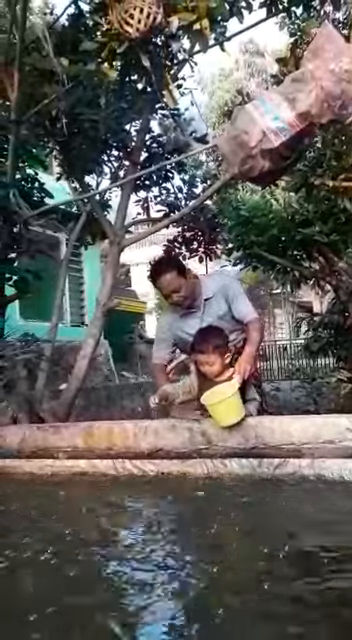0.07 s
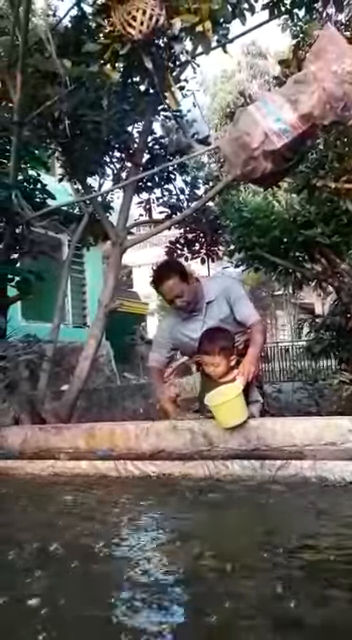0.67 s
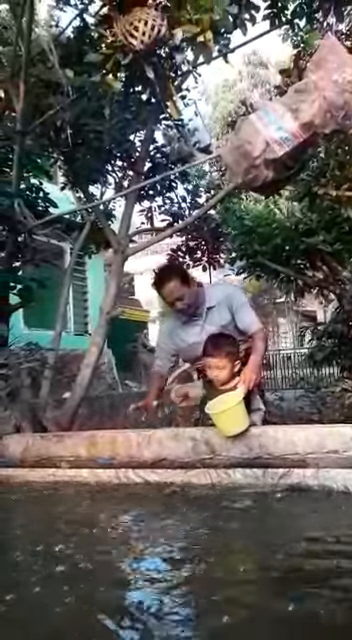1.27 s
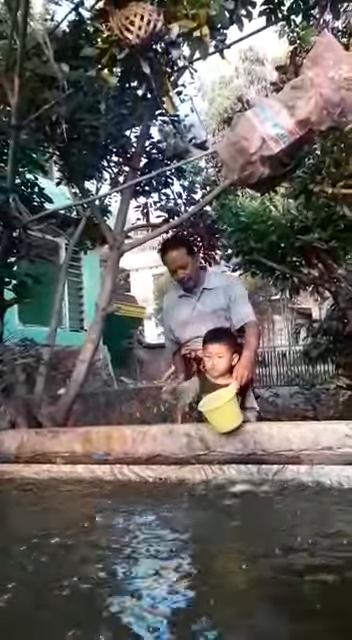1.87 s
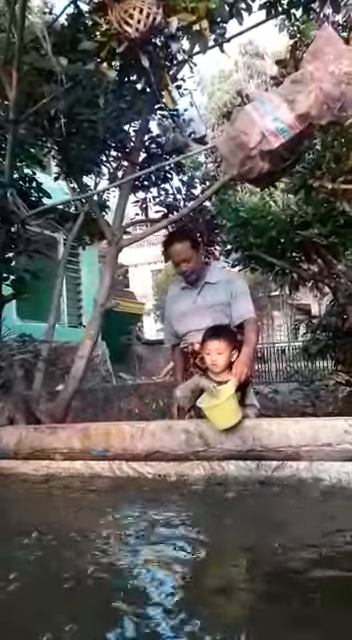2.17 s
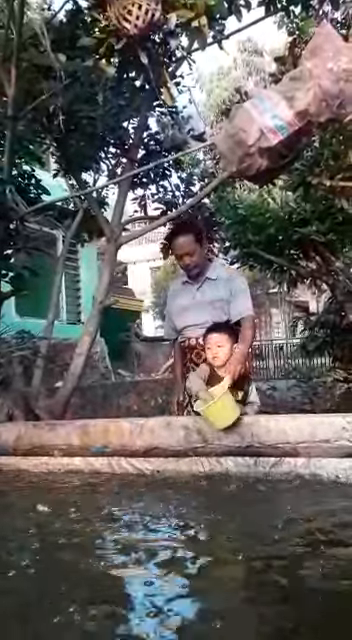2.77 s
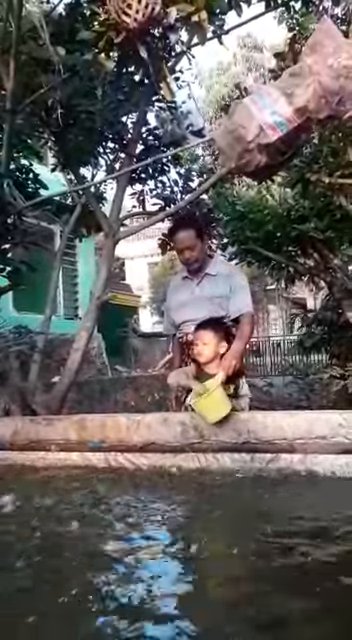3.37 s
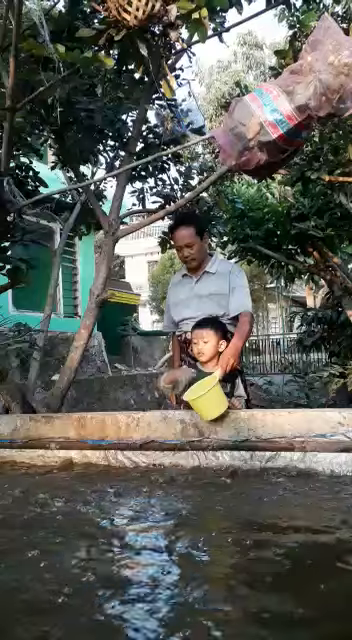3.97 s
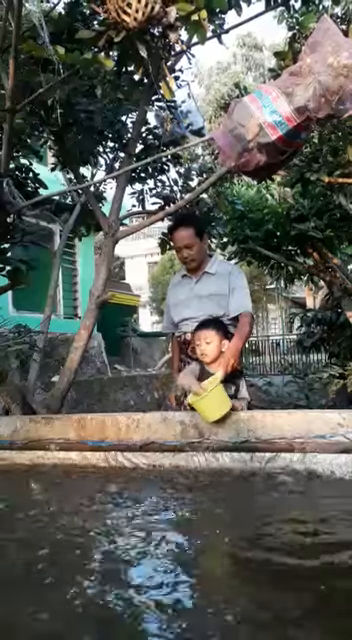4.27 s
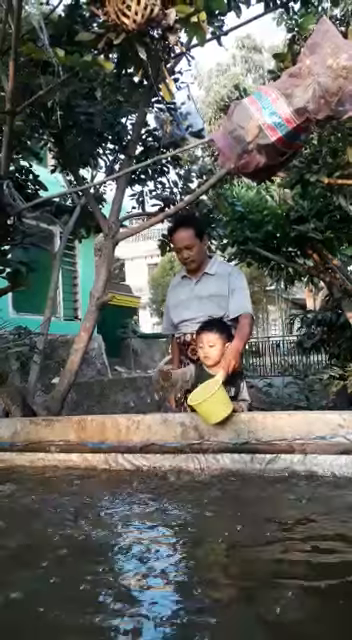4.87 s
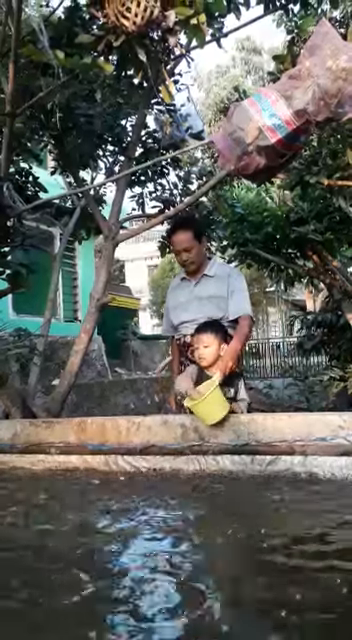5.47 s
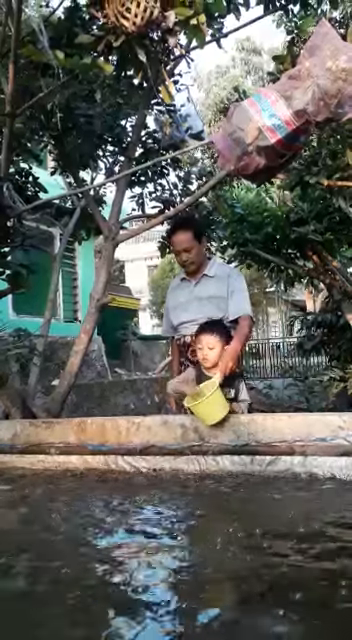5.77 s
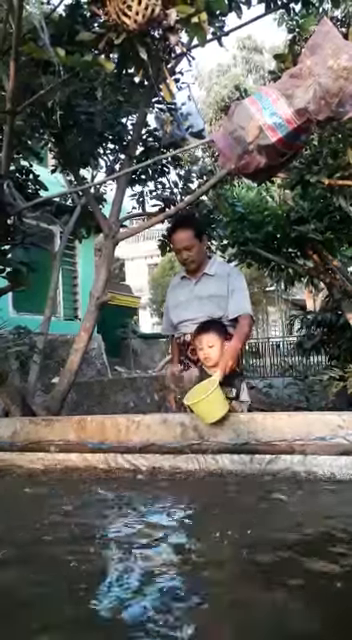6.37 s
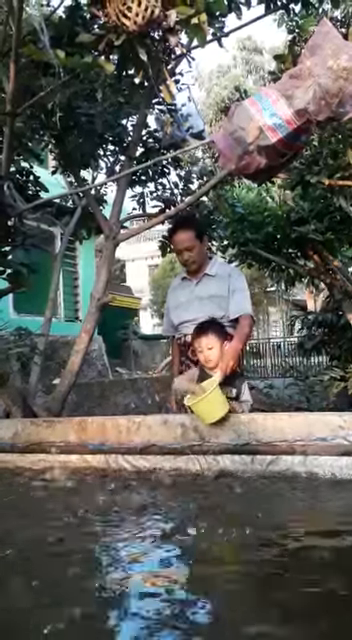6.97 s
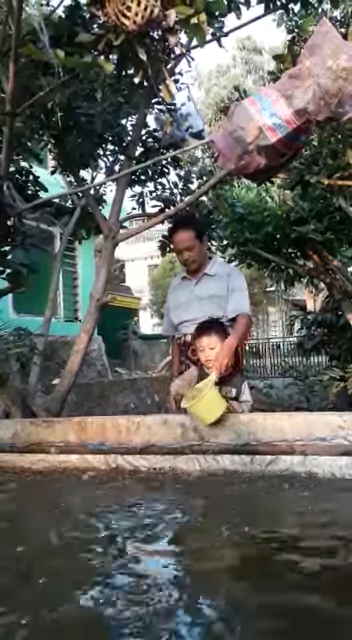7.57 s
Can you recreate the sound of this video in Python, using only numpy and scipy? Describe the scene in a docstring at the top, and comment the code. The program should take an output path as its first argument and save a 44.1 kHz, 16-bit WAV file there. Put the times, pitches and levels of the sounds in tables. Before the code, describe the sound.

Fish feed at the surface of an outdoor pond, heard from near the water. For the first 1.5 seconds there is a soft gurgle and fizz, with tiny high ticks of pellets and droplets and a few small plops. From about 1.5 to 2.1 seconds comes a cluster of short tail splashes and sharp, bubbly mouth snaps, the strongest near 1.7 seconds. The water then stays busier, with hollow gulps that slide up in pitch, plinking drips and trickling spray. A sharp drip lands near 2.9 seconds. More snaps and quick splashes stand out around 3.5, from 4.3 to 5.4, and around 6.4 seconds. The churning is densest from about 7 seconds to the end, near 7.7 seconds. The pond walls add a very short echo, and a faint, steady low rumble of the surroundings lies underneath throughout.

```python
"""A walled garden pond, where fish feed at the surface while pellets patter onto the water.
Mouths snap and gulp, tails throw short splashes and droplets tick all around; the stirring grows denser.
Nearly every sound is a trapped air bubble ringing like a tiny bell: the smaller it is, the higher it
rings. The pond walls answer with a short echo, over a faint outdoor rumble."""
import sys
import numpy as np
from scipy import signal
from scipy.fft import rfft, irfft, next_fast_len
from scipy.io import wavfile
from scipy.ndimage import map_coordinates

SR = 44100
rng = np.random.default_rng(int(sys.argv[2]) if len(sys.argv) > 2 else 0)


def pcm_store(signal):
    """Save signal as 16-bit PCM."""
    levels = np.round(np.clip(np.atleast_2d(signal), -1, 1) * 32767)
    wavfile.write(sys.argv[1], SR, levels.astype(np.int16).T)


N = 340893

# the nearest mouth snaps, droplet ticks and deep plops: (time [s], pitch [Hz], level [dB])
SNAPS = [(.012, 10800, -30), (.094, 10100, -36), (0.153, 11800, -24.5), (0.2107, 11900, -23),
         (0.2413, 11500, -28), (.302, 4400, -39), (.3363, 10400, -32), (.337, 6900, -30),
         (0.362, 9800, -24), (.3762, 4500, -44), (0.391, 2430, -35), (0.4243, 1530, -27),
         (.5467, 9750, -21.5), (0.5754, 11800, -21), (0.6015, 1950, -28.5), (.6037, 4480, -34),
         (.614, 1400, -39), (.627, 9980, -23.5), (0.678, 10800, -24), (.680, 2070, -30), (.707, 9600, -29),
         (.7358, 12200, -22), (.7408, 5300, -26), (0.7452, 1820, -17.5), (.8518, 11700, -31),
         (0.856, 1830, -34), (.9312, 9100, -28), (0.947, 11300, -19.5), (1.0015, 9300, -34),
         (1.106, 8700, -26), (1.130, 13400, -22), (1.2505, 6560, -29), (1.265, 4630, -33),
         (1.2862, 10800, -29), (1.319, 7600, -25), (1.3638, 10900, -19), (1.3886, 10100, -18),
         (1.428, 3970, -28), (1.447, 9500, -20), (1.525, 5000, -27), (1.633, 3730, -9), (1.726, 3130, -2),
         (1.7278, 10500, -14), (1.89, 2930, -26), (1.9872, 9130, -16), (2.0276, 2370, -10),
         (2.0414, 9000, -13.5), (2.253, 2000, -25), (2.331, 1820, -30), (2.395, 2400, -35),
         (2.418, 12000, -26), (2.438, 3230, -31), (2.484, 11200, -22), (2.521, 4570, -28),
         (2.5993, 1740, -18.5), (2.7637, 10500, -17.5), (2.765, 2360, -20), (2.807, 4180, -32),
         (2.8455, 7100, -23), (2.874, 6040, -19), (3.051, 7200, -19), (3.1113, 2940, -24),
         (3.1506, 4400, -16.5), (3.202, 11800, -25), (3.2467, 1110, -14), (3.305, 3980, -26),
         (3.3083, 9040, -22), (3.5097, 10100, -8), (3.5148, 3680, -19.5), (3.578, 3040, -29),
         (3.5897, 10400, -14), (3.597, 3030, -21), (3.8157, 11000, -28), (3.864, 10800, -19),
         (4.0103, 8970, -30), (4.132, 3730, -29), (4.23, 14200, -19), (4.2780, 4350, -19.5),
         (4.2784, 9150, -22), (4.3640, 2120, -14), (4.3648, 5440, -13), (4.37, 12000, -10),
         (4.4976, 8680, -18), (4.5094, 10900, -18), (4.583, 10200, -18), (4.5915, 8960, -28),
         (4.7410, 11000, -9.5), (4.7412, 3400, -12.5), (4.8646, 3900, -13.5), (4.8958, 1740, -10),
         (4.896, 540, -24), (4.9009, 3820, -9.5), (4.96, 12900, -23), (5.022, 2460, -22),
         (5.0860, 3750, -23), (5.099, 10800, -20), (5.314, 9000, -20), (5.3285, 10600, -8),
         (5.522, 12400, -18), (5.708, 2520, -16.5), (5.797, 8830, -27), (5.9030, 2280, -19),
         (5.905, 3750, -25), (6.0276, 8720, -29), (6.0397, 9800, -19), (6.041, 2900, -21.5),
         (6.1147, 1790, -30), (6.126, 3500, -21.5), (6.131, 9150, -21), (6.1322, 1720, -29),
         (6.274, 4020, -30), (6.3880, 10300, -4), (6.3891, 840, -22), (6.5126, 12200, -8),
         (6.528, 5300, -14), (6.527, 600, -26), (6.754, 9110, -20.5), (7.033, 10550, -26),
         (7.111, 1030, -20), (7.205, 1100, -23), (7.229, 8660, -22), (7.2858, 1180, -17),
         (7.2905, 900, -17), (7.2903, 6100, -12.5), (7.5340, 5270, -19), (7.5850, 4000, -18.5),
         (7.677, 9200, -25)]
# tail flicks and slaps: (time [s], length [s], bubble pitch [Hz], bubble level [dB], spray level [dB])
TAIL_FLICKS = [(.004, 0.047, 3800, -49, -64), (0.115, 0.016, 2780, -45.5, -58),
               (0.289, .07, 4200, -55, -64), (0.384, 0.013, 2300, -44.5, -59),
               (0.739, 0.0086, 3660, -43, -50), (1.501, 0.033, 2930, -42, -38),
               (1.62, 0.025, 3940, -40, -37), (1.725, 0.02, 2980, -40, -31.5),
               (1.886, 0.021, 3500, -50, -36.5), (1.919, 0.031, 1710, -36.5, -33.5),
               (1.967, 0.019, 1890, -33, -35.5), (2.045, 0.028, 2610, -51, -36),
               (2.271, 0.046, 1130, -42.5, -44), (2.842, 0.023, 1520, -40, -36.5),
               (3.112, 0.01, 1630, -33.5, -38), (3.222, .012, 1920, -35, -41),
               (3.244, 0.011, 1480, -29, -48), (3.342, 0.014, 2100, -33.5, -36),
               (3.472, 0.01, 1890, -32, -52), (3.507, 0.012, 4470, -37, -32),
               (3.593, .012, 1970, -28.5, -30), (3.861, 0.044, 1400, -51, -59),
               (3.968, .03, 1610, -39.5, -45), (4.009, 0.0048, 2180, -32, -54),
               (4.237, 0.0074, 2650, -30.5, -37.5), (4.3598, 0.0079, 3530, -32, -29),
               (4.469, 0.0094, 2000, -27, -32.5), (4.765, 0.019, 1460, -31.5, -37.5),
               (4.896, 0.0095, 1800, -26.5, -35), (5.316, .005, 2380, -39, -47),
               (5.362, 0.014, 2930, -36, -33), (5.377, 0.054, 1150, -36.5, -42),
               (5.708, 0.0062, 2610, -47, -37), (5.845, 0.014, 2270, -35.5, -44),
               (6.047, 0.012, 3920, -55, -38.5), (6.13, 0.0073, 3000, -42, -40),
               (6.233, 0.013, 2180, -36, -44), (6.344, 0.0063, 2600, -35.5, -38),
               (6.388, 0.013, 1310, -34.5, -31.5), (6.467, 0.025, 2010, -34.5, -36),
               (6.524, 0.014, 4700, -30, -27), (6.568, 0.018, 4030, -34, -29.5),
               (6.581, 0.026, 1590, -35.5, -45), (7.084, 0.04, 1064, -35, -37.5),
               (7.188, 0.029, 1850, -35.5, -38.5), (7.287, 0.018, 1085, -29, -32),
               (7.36, 0.044, 1400, -39, -39), (7.583, 0.022, 1340, -39, -35.5)]
# big gulped bubbles: (time [s], starting pitch [Hz], length [s], pitch climb [octaves], level [dB])
GULP_BUBBLES = [(0.553, 750, .045, 0.17, -39.5), (0.975, 1800, .012, 0.41, -39),
                (1.014, 764, 0.023, 0.78, -45), (1.023, 1800, 0.012, 0.29, -38),
                (1.043, 1032, 0.027, 0.9, -42), (1.141, 836, 0.03, 0.43, -34),
                (1.348, 800, 0.0078, .3, -36), (1.395, 1530, 0.015, 0.24, -42),
                (1.423, 986, 0.029, .35, -44), (1.453, 870, 0.022, -0.04, -35.5),
                (1.488, 1590, 0.01, 0.23, -34), (1.489, 920, .016, .3, -40),
                (1.774, 907, 0.016, 0.4, -27.5), (1.813, 1920, 0.0078, 0.24, -25),
                (1.868, 536, 0.014, 0.26, -32), (1.944, 750, 0.011, 0.29, -27.5),
                (2.064, 1060, 0.014, 0.32, -27), (2.144, 804, 0.012, 0.34, -33),
                (2.278, 790, 0.02, 0.36, -31.5), (2.306, 760, 0.0175, 0.46, -30.5),
                (2.427, 1150, 0.0066, 0.32, -27), (2.54, 634, 0.0092, 0.14, -29.5),
                (2.647, 1200, 0.012, .2, -34), (2.74, 523, 0.0068, 0.34, -29),
                (2.789, 472, 0.011, 0.43, -32), (2.844, 560, 0.011, 0.64, -30),
                (2.993, 715, 0.046, 0.28, -36), (3.285, 1070, .011, 0.14, -37),
                (3.325, 807, 0.024, 0.91, -34), (3.398, 703, 0.018, .3, -37),
                (3.54, 477, 0.014, 0.17, -31.5), (3.624, 580, 0.025, .5, -35.5),
                (3.637, 1800, 0.011, 0.26, -27), (3.653, 933, .01, 0.19, -29.5),
                (3.746, 585, 0.027, -0.046, -34), (3.861, 1017, 0.021, 0.72, -22),
                (3.962, 1106, 0.029, 0.23, -37), (4.027, 683, 0.031, 0.17, -35),
                (4.105, 1370, 0.014, 0.27, -33), (4.123, 1210, 0.014, 0.17, -31),
                (4.266, 219, 0.04, 0.41, -42), (4.437, 860, 0.0096, 0.39, -30),
                (4.647, 1060, 0.016, 0.12, -30), (5.044, 820, 0.026, -0.083, -32),
                (5.072, 500, 0.011, -0.11, -36.5), (5.088, 688, 0.015, 0.16, -33),
                (5.158, 844, 0.036, 0.47, -37.5), (5.299, 600, 0.035, 0.031, -35),
                (5.318, 1160, 0.014, 0.29, -28), (5.381, 995, 0.026, 0.22, -28),
                (5.395, 212, 0.029, 0.41, -37), (5.421, 954, 0.02, 0.6, -38), (5.644, 461, 0.02, 1, -20),
                (5.79, 1210, 0.012, 0.05, -27.5), (5.847, 1298, 0.027, 0.17, -26),
                (5.958, 1040, 0.0064, 0.049, -33), (6.061, 1070, 0.007, 0.17, -33),
                (6.285, 730, 0.025, 0.38, -33.5), (6.317, 940, 0.02, 0.78, -32.5),
                (6.54, 840, 0.01, 0.12, -25.5), (6.596, 442, 0.018, 0.4, -29.5),
                (6.618, 520, .013, 0.093, -33), (6.648, 1120, .018, -0.079, -37.5),
                (6.716, 468, 0.041, 0.29, -29), (6.769, 722, 0.02, 0.61, -29.5),
                (6.784, 1167, 0.016, 0.34, -21.5), (6.848, 1240, 0.032, 0.14, -31),
                (6.863, 688, .05, 0.51, -40), (7.011, 1616, 0.014, 0.45, -28),
                (7.082, 640, .011, 0.31, -27), (7.112, 730, 0.011, 0.62, -27),
                (7.119, 272, 0.023, 0.57, -33.5), (7.287, 577, 0.014, 0.03, -27),
                (7.605, 725, 0.018, 0.5, -26)]
# drops falling back into the pond: (time [s], pitch [Hz], ring time [s], level [dB])
FALLING_DROPS = [(0.747, 1770, 0.011, -33), (.768, 3400, 0.0043, -34), (1.08, 2060, 0.0017, -22.5),
                 (1.308, 7750, 0.00065, -20), (1.509, 1850, 0.0035, -28), (1.573, 8300, .0012, -29),
                 (1.633, 5180, .0015, -20), (1.727, 2930, 0.017, -26), (1.83, 2880, .002, -31),
                 (1.889, 2020, .002, -26), (1.975, 3000, .002, -19), (2.054, 3000, 0.0024, -24),
                 (2.124, 2120, 0.0028, -32), (2.16, 5660, 0.0019, -31), (2.168, 2060, 0.0029, -30),
                 (2.512, 2480, 0.0019, -24), (2.549, 1560, 0.0025, -24), (2.837, 2460, 0.0022, -24),
                 (2.854, 2680, 0.0024, -24), (2.8753, 1920, 0.0013, -4.5), (2.877, 1954, 0.012, -37),
                 (2.884, 1520, 0.0033, -25), (3.092, 2890, .002, -31), (3.193, 2960, 0.0022, -26),
                 (3.369, 3200, .002, -23), (3.389, 2200, 0.0019, -23), (3.414, 1910, 0.0025, -25),
                 (3.446, 1920, .003, -25), (3.539, 6700, .0013, -24), (3.708, 4100, .0013, -26),
                 (3.73, 1940, 0.0034, -28), (3.787, 2850, 0.0023, -26), (3.829, 1900, 0.0019, -23.5),
                 (3.915, 5260, .0013, -23), (4.181, 1700, 0.0036, -29), (4.486, 2170, 0.0066, -33),
                 (4.529, 2480, 0.0019, -20), (4.668, 2650, .002, -29), (5.03, 4270, 0.0022, -27.5),
                 (5.045, 2970, .002, -29), (5.043, 1780, .002, -23), (5.113, 4320, 0.0025, -32),
                 (5.114, 6050, .003, -29), (5.124, 2900, .005, -40), (5.143, 3080, 0.0054, -35),
                 (5.362, 3140, 0.0028, -19.5), (5.623, 4600, 0.0017, -30.5), (5.903, 2170, 0.018, -36),
                 (5.905, 3880, .009, -30), (6.041, 2930, 0.0033, -22), (6.045, 5220, .002, -24),
                 (6.272, 2090, 0.0016, -25), (6.428, 1900, 0.0041, -27.5), (6.6, 2030, 0.0043, -21),
                 (6.617, 1630, 0.0018, -23), (6.671, 3770, .002, -31), (6.692, 3540, .003, -27),
                 (6.706, 4330, 0.0019, -32), (6.893, 4120, 0.0023, -27.5), (6.942, 2010, 0.0036, -26),
                 (6.999, 4250, 0.0021, -26), (7.031, 2150, .003, -31), (7.208, 3100, .002, -25),
                 (7.36, 3160, .002, -33), (7.36, 1660, 0.0027, -22), (7.452, 3200, 0.0018, -31),
                 (7.475, 1830, .002, -28), (7.51, 1700, 0.0028, -26), (7.535, 5470, 0.0068, -30),
                 (7.597, 2240, .002, -30)]
# how hard the fish stir the water: (time [s], level [dB])
STIR_LEVEL = [(0, -51), (.2, -57), (.5, -60), (.65, -55), (.95, -54), (1.25, -56.5), (1.5, -49.5),
              (1.65, -49), (1.8, -49), (2.1, -46.5), (2.25, -52), (2.5, -50.5), (2.65, -45.5),
              (2.85, -46.5), (3.5, -46.5), (3.75, -47.5), (4.0, -46), (4.22, -46.5), (4.45, -44),
              (4.9, -44), (5.2, -46.5), (5.4, -41), (5.65, -47.5), (5.85, -43), (6.03, -51), (6.2, -47),
              (6.5, -46), (6.85, -44.5), (7.15, -42.5), (7.4, -41), (7.73, -44)]
# how much water is thrown about and trickles back: (time [s], level [dB])
SPRAY_LEVEL = [(0, -54), (.2, -58), (.38, -53.5), (.53, -58), (.8, -54.5), (1.15, -54.5), (1.3, -54),
               (1.58, -51.5), (1.75, -48.5), (1.85, -48), (1.97, -42.5), (2.2, -50), (2.3, -42.5),
               (2.35, -52.5), (2.45, -45), (2.5, -52.5), (2.57, -45), (2.64, -51.5), (2.7, -53),
               (2.85, -45), (3.03, -46.5), (3.3, -45.5), (3.6, -44), (3.78, -44.5), (3.95, -43.5),
               (4.2, -50.5), (4.47, -43), (4.68, -46), (4.85, -46.5), (5.0, -43.5), (5.22, -47),
               (5.38, -45), (5.55, -47), (5.69, -44), (5.8, -51), (5.95, -49), (6.0, -53.5), (6.12, -51),
               (6.33, -50), (6.5, -50.5), (6.58, -47), (6.72, -42), (6.85, -47), (7.0, -42), (7.2, -40.5),
               (7.26, -46.5), (7.38, -43.5), (7.73, -44)]
# the dull tone of sloshing water: (frequency [Hz], level [dB])
SLOSH_TONE = [(60, -23.5), (150, -7), (260, -7.5), (400, -5.5), (600, -2), (1000, -1.5), (1500, -5.5),
              (2200, -15.5), (4000, -36), (12000, -45)]
# the bright, hissy tone of spray: (frequency [Hz], level [dB])
WASH_TONE = [(600, -38), (1500, -5.5), (2200, -3.5), (4000, -1), (6500, -1.5), (9000, -1.5), (16000, -9)]
# how long the wall echo takes to fade by 60 dB: (frequency [Hz], fade time [s])
ECHO_FADE = [(200, 0.19), (1500, 0.28), (5000, 0.15), (14000, 0.26)]
# the deep tone of the distant surroundings: (frequency [Hz], level [dB])
RUMBLE_TONE = [(25, -29), (50, 1), (85, 3.5), (120, 1.5), (160, 3.5), (250, -2.5), (450, -3.5), (700, -11),
               (1200, -22), (4000, -26.5), (16000, -27)]
# how the microphone lifts or lowers each frequency: (frequency [Hz], gain [dB])
MICROPHONE_TONE = [(25, -17), (45, -12.5), (70, -4), (3000, -1.5), (4300, 1.5), (5400, -1), (6500, 0.5),
                   (7800, -5), (9000, 3.5), (9800, 0), (11000, 0.5), (13000, -3), (15800, -1)]

TOP_HZ = 15950  # the microphone hears nothing above this


def snaps():
    """A mouth or a droplet cracks the surface and traps one bubble, which rings for a few cycles."""
    times, hz, db = np.transpose(SNAPS)
    octaves = np.log2(hz / 4000)  # how far above 4 kHz
    # small bubbles ring for more cycles; hard snaps break theirs sooner
    cycles = 2.23 * (hz / 4000) ** 0.09 * 2 ** (-(db + 20) / 22.5)
    gain = amp(db + 3 + 0.9 * octaves)
    track = full_length(bubbles(times, hz, gain, cycles, rise=0.004, swell_cycles=0.38))
    t = np.arange(SR // 200) / SR
    for start, crack_db in zip(times, db - 14 - 0.5 * octaves):  # tiny droplets crack less
        crack = rng.standard_normal(len(t)) * fade(t, seconds=0.0035)
        add(track, start, amp(crack_db) * crack)
    return track


def splashes():
    """A tail tears the surface into bubbles and spray; a hiss, falling droplets and a few plips follow."""
    def births(length, count):
        return length * np.linspace(0, 1, count) ** 1.1 * rng.uniform(.4, 1.35, count)

    track, hiss_gain = np.zeros((2, N))
    t = np.arange(SR // 3) / SR
    for start, length, hz, bubble_db, spray_db in TAIL_FLICKS:
        cloud = swarm(births(length, 36), hz=hz, octaves=.55, cycles=1.8, spread_db=5.5, rise=.03)
        spray = swarm(births(length, 60), hz=9200, octaves=.45, cycles=.7, spread_db=5, rise=.01)
        plips = swarm(2 * births(length, 7), hz=0.9 * hz, octaves=.4, cycles=9, spread_db=3,
                      rise=.15, swell_cycles=3)
        landings = length + rng.exponential(.022, size=16)  # droplets fly for 22 ms on average
        droplets = swarm(landings, hz=5600, octaves=.6, cycles=3, spread_db=4, rise=.03)
        for layer, db in [(cloud, bubble_db - .7), (spray, spray_db - .6),
                          (plips, bubble_db - 11.5), (droplets, spray_db - 12)]:
            add(track, start, amp(db) * layer * np.sqrt(length * SR / np.sum(layer ** 2)))
        # the thrown sheet of water hisses as it falls back
        swell = 1 - np.exp(-t / 0.0065)
        add(hiss_gain, start, amp(spray_db - 8.5) * swell * fade(t, seconds=0.11))
    return track + hiss_gain * unit(noise(WASH_TONE))


def gulps():
    """A big air pocket swells, quivers and dies away; its pitch slides, mostly up, as it changes shape."""
    track = np.zeros(N)
    quiver, flutter = wobble(rate_hz=260), wobble(rate_hz=300)
    for start, start_hz, length, climb, db in GULP_BUBBLES:
        progress = np.arange(int(2 * length * SR)) / (length * SR)
        now = np.minimum(int(start * SR) + np.arange(len(progress)), N - 1)
        hz = start_hz * 2 ** (climb * np.minimum(progress, 1.3)) * (1 + .04 * quiver[now])
        shape = (1 - np.exp(-progress / 0.11)) * np.exp(-1.8 * progress ** 2)
        gain = amp(db - 1.3 + 2.3 * flutter[now]) * shape / shape.max()
        add(track, start, gain * np.sin(2 * np.pi * np.cumsum(hz) / SR))
    return track


def drips():
    """A falling drop traps a bubble that rings on, its pitch creeping upward."""
    times, hz, ring_s, db = np.transpose(FALLING_DROPS)
    return full_length(bubbles(times, hz, amp(db), cycles=ring_s * hz, rise=.028, swell_cycles=1))


def stirring():
    """The fish churn the whole pond: far bubbles blur into a wash, and nearer ones stand out of it."""
    lapping_db = 0.9 * wobble(rate_hz=40)
    gurgle_db = level(STIR_LEVEL) + lapping_db + 0.5 * wobble(rate_hz=8)
    spray_db = level(SPRAY_LEVEL) + lapping_db
    fizz_db = -46.5 + 0.62 * (spray_db - spray_db.mean()) + wobble(rate_hz=47)  # more spray, more fizz
    slosh, wash = noise(SLOSH_TONE), noise(WASH_TONE)
    gurgle = swarm(random_times(2400), hz=1150, octaves=.55, cycles=3.4, spread_db=5, rise=.06)
    patter = swarm(random_times(4400), hz=3200, octaves=.62, cycles=2.6, spread_db=3.3, rise=.045)
    fizz = swarm(random_times(9000), hz=10460, octaves=.39, cycles=2.9, spread_db=5, rise=.0053)
    # pellets and droplets tick one by one
    ticks = swarm(random_times(150), hz=11600, octaves=.18, cycles=2.4, spread_db=4, rise=.01)
    # bubbles that reach the surface chirp upward
    plips = swarm(random_times(420), hz=1400, octaves=.65, cycles=6.5, spread_db=2.5,
                  rise=.12, swell_cycles=4)
    layers = [(slosh, gurgle_db - 3.5), (gurgle, gurgle_db - 1.5), (plips, gurgle_db - 11),
              (wash, spray_db - 2), (patter, spray_db - 0.5),
              (fizz, fizz_db - 1), (ticks, fizz_db - 9)]
    return sum(amp(db) * unit(full_length(layer)) for layer, db in layers)


def walls(sound, near_db, near_fade_s, far_db, spots):
    """The pond's rim and garden walls echo; each slice of time gets its own echo, as if from a new spot."""
    track = np.zeros(N)
    for part in np.array_split(np.arange(N), spots):
        hz, t, spectrum = signal.stft(rng.standard_normal(SR // 3), SR, nperseg=256)
        spectrum = spectrum * fade(t, seconds=along(ECHO_FADE, hz)[:, None])
        far = signal.istft(spectrum, SR, nperseg=256)[1]
        bounces = rng.standard_normal(len(far)) ** 3  # cubing makes a few stand out
        near = bounces * fade(np.arange(len(far)) / SR, near_fade_s)
        echo = amp(near_db) * near / np.linalg.norm(near) + amp(far_db) * far / np.linalg.norm(far)
        add(track, part[0] / SR + 0.001492, signal.fftconvolve(sound[part], echo))
    return track


def outdoors():
    """The distant surroundings make a faint, steady rumble."""
    return amp(-55.5) * unit(noise(RUMBLE_TONE))


def bubbles(times, hz, gain, cycles, rise, swell_cycles):
    """Each bubble is a sine wave: over `cycles` it fades to 37% and its pitch climbs by the share `rise`."""
    lengths = (6 * cycles / hz * SR).astype(int) + 2
    owner = np.repeat(np.arange(len(times)), lengths)  # which bubble each sample belongs to
    age = np.arange(lengths.sum()) - np.repeat(np.cumsum(lengths) - lengths, lengths)
    turns = hz[owner] * age / SR
    life = turns / cycles[owner]
    shape = np.exp(-life) * (1 - np.exp(-turns / swell_cycles))
    wave = gain[owner] * shape * np.sin(2 * np.pi * turns * (1 + rise * life / 2))
    return np.bincount((np.abs(times[owner]) * SR).astype(int) + age, wave)


def swarm(times, hz, octaves, cycles, spread_db, rise, swell_cycles=0.31):
    """Many bubbles, each with its own random pitch around hz, strength and ring time."""
    height, strength, ring = rng.standard_normal((3, len(times)))
    pitch = hz * 2 ** (octaves * np.clip(height, -2.5, 2.5))
    gain = amp(spread_db * np.minimum(strength, 2)) * (pitch < TOP_HZ)
    return bubbles(times, pitch, gain, cycles * np.exp(.35 * ring), rise, swell_cycles)


def random_times(count):
    """Random moments over the whole scene."""
    return rng.uniform(0, N / SR, count)


def wobble(rate_hz):
    """A smooth random curve that takes rate_hz new values a second."""
    return unit(map_coordinates(rng.standard_normal(4096), [np.arange(N) * rate_hz / SR], mode="wrap"))


def noise(tone):
    """Steady noise shaped by a tone table."""
    return coloured(rng.standard_normal(N), tone)


def coloured(sound, tone):
    """Filter a sound with a tone table."""
    size = 2 * next_fast_len(N)
    cepstrum = irfft(np.log(amp(along(tone, np.fft.rfftfreq(size, 1 / SR)))))
    # this makes the filter ring only after a sound, never before it
    cepstrum[1:size // 2] *= 2
    cepstrum[size // 2 + 1:] = 0
    return irfft(rfft(sound, size) * np.exp(rfft(cepstrum)), size)[:N]


def along(table, hz):
    """Read a frequency table at hz, with octaves evenly spaced."""
    frequencies, values = np.transpose(table)
    return np.interp(np.log(hz + 1), np.log(frequencies), values)


def level(table):
    """Read a level table at every sample."""
    return np.interp(np.arange(N) / SR, *np.transpose(table))


def fade(t, seconds):
    """A gain that falls by 60 dB in the given time."""
    return amp(-60 * t / seconds)


def amp(db):
    """Turn decibels into a gain."""
    return 10 ** (np.asarray(db) / 20)


def unit(sound):
    """Scale a sound to an average strength (rms) of 1."""
    return sound / np.sqrt(np.mean(sound ** 2) + 1e-20)


def full_length(sound):
    """Pad or cut a sound to the scene's length."""
    return np.pad(sound, (0, N))[:N]


def add(track, start_s, sound):
    """Mix a sound into the track at start_s."""
    part = track[max(round(start_s * SR), 0):][:len(sound)]
    part += sound[:len(part)]


def scene():
    """Mix water, echo and open air; the gulps, down at the waterline, get a larger share of echo."""
    water = stirring() + splashes() + drips()
    snapping, gulping = snaps(), gulps()
    echo = walls(water + amp(2.5) * snapping + amp(1.5) * gulping,
                 near_db=-10, near_fade_s=0.0094, far_db=-11.5, spots=110)
    direct = water + snapping + amp(-1.8) * gulping
    pond = amp(-1.5) * direct + echo
    # small bubbles give off no deep bass
    pond = signal.sosfilt(signal.butter(2, 110, "highpass", fs=SR, output="sos"), pond)
    return (pond + outdoors())[None]


def record(dry):
    """A small microphone lifts parts of the treble and cuts off everything above TOP_HZ."""
    heard = coloured(dry[0], MICROPHONE_TONE)
    in_range = np.fft.rfftfreq(2 * N, 1 / SR) < TOP_HZ
    return irfft(rfft(heard, 2 * N) * in_range)[None, :N]


dry = scene()
out = record(dry)
pcm_store(out)
```